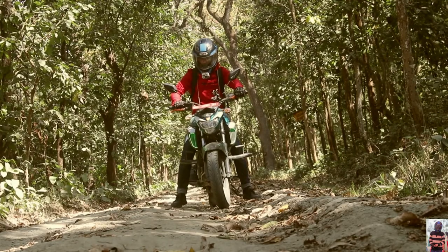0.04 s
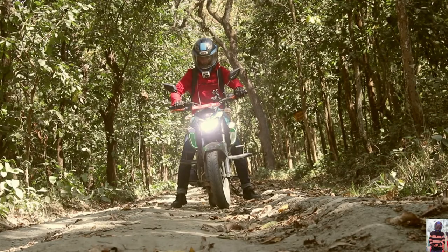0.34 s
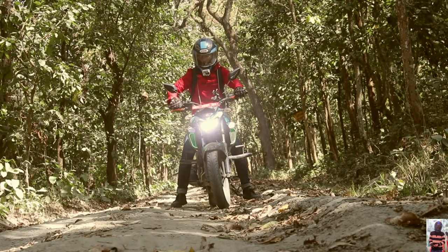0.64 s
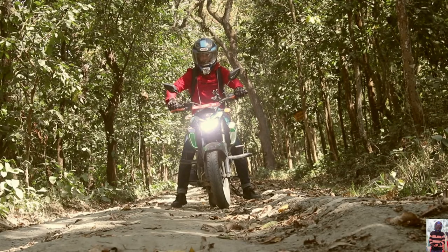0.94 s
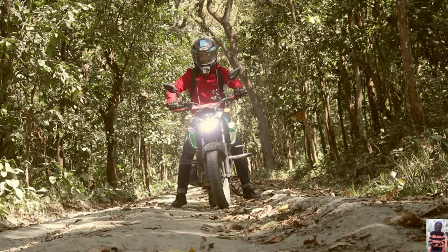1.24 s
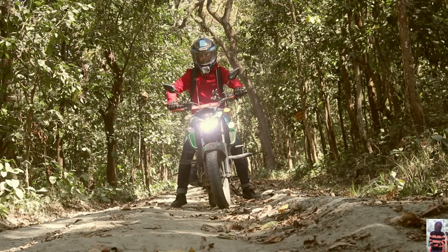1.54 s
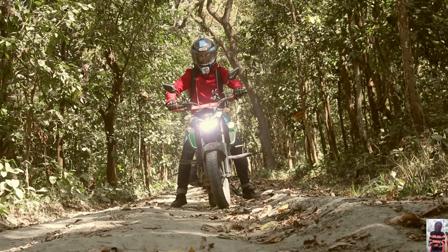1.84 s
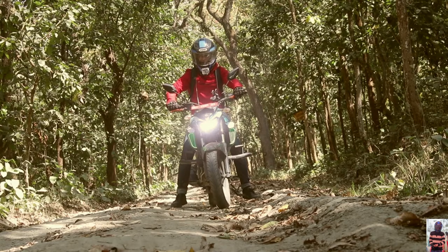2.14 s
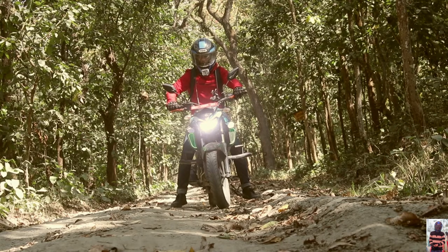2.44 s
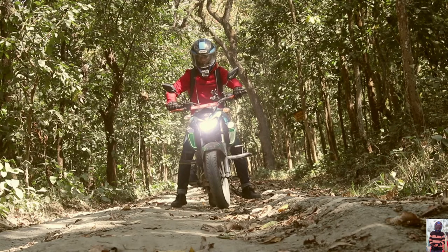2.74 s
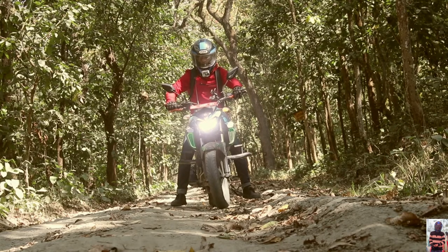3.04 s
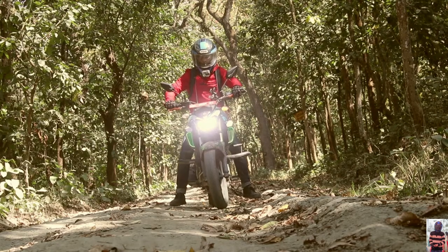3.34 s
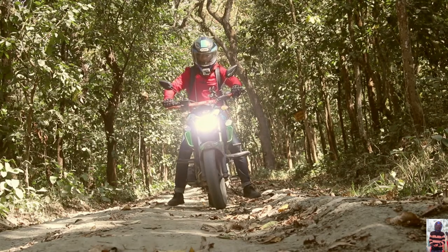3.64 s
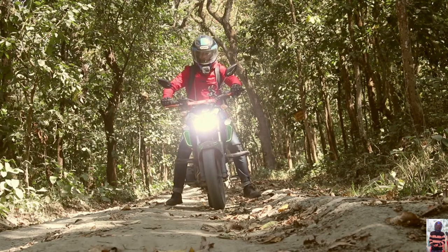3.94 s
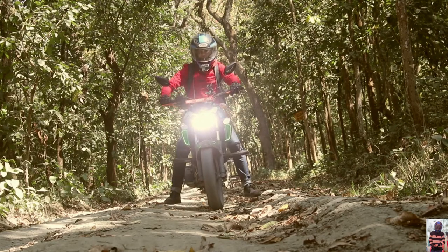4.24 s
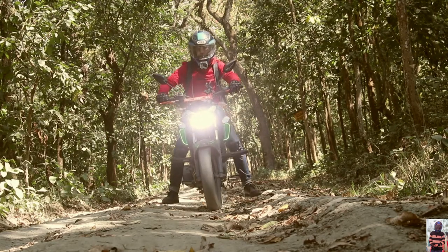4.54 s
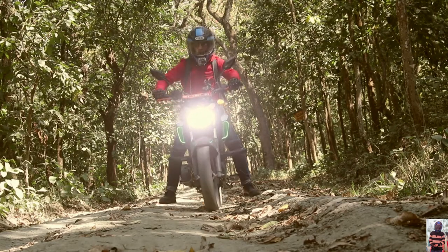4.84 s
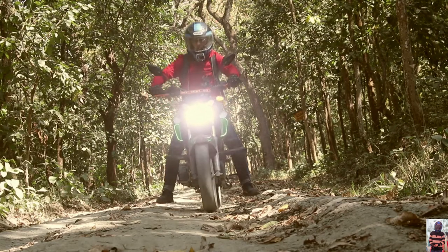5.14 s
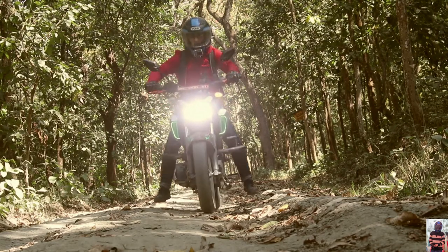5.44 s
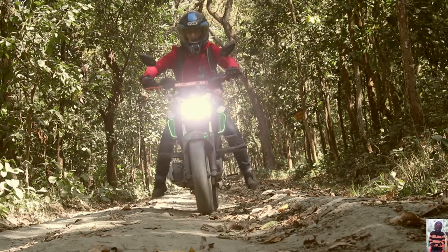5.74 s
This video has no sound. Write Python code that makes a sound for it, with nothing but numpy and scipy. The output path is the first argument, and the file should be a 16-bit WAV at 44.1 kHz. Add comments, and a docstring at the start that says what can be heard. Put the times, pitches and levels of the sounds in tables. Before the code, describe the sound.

A single-cylinder motorcycle is heard from some metres away on a forest track. From the start it is turned over with slow, deep chugs, a hollow drone and irregular metallic clacks. A brighter gear clash comes at about 0.6 seconds and a faint, thin squeak near 1.3. Between 1.6 and 2.1 seconds the engine catches with five heavy, barking thumps. It then runs up, reaching a fast idle at around 3 seconds: a rapid, throbbing exhaust beat with hollow intake honks, a gassy rasp, churning gears and ticking valves. From about 3.5 seconds it stays loud but gradually slows, labouring as the clutch takes up the load. The beat weakens around 5.8 seconds, and one last heavy thump lands just before 6. The trees add only a short, thin scatter to the pulses.

```python
"""Slow thumps and clatter: a single-cylinder four-stroke motorcycle is turned over on a forest track,
some metres away. It catches with a few barks, runs up to a fast idle, then labours and rasps as the
clutch takes up the load. Each firing pushes gas through a ringing pipe and a booming silencer, each
intake gulp honks in the air box, and gears and valves rattle the metal. Tree trunks scatter the pulses."""
import sys
import numpy as np
from scipy import signal
from scipy.fft import rfft, irfft, next_fast_len
from scipy.io import wavfile
from scipy.ndimage import map_coordinates

SR = 44100
rng = np.random.default_rng(int(sys.argv[2]) if len(sys.argv) > 2 else 0)


def unload_wav(signal):
    """Save mono or channel-first audio to the path in sys.argv[1] as 16-bit WAV at rate SR, clipped to [-1, 1]."""
    wavfile.write(
        sys.argv[1],
        SR,
        np.round(np.clip(np.atleast_2d(signal).T, -1, 1) * 32767).astype(np.int16),
    )


N = 264600

# engine speed once it runs: (time [s], firing rate [Hz])
FIRING_RATE = [(2.18, 10.03), (2.4, 10.81), (2.65, 12.27), (2.9, 13.95), (3.15, 14.68), (3.45, 14.19),
               (3.9, 14.01), (4.35, 13.75), (4.8, 13.33), (5.2, 12.71), (5.6, 12.03), (6.0, 11.88)]
# bright clink of small steel parts: (frequency [Hz], level [dB])
CLINK_SPECTRUM = [(600, -15), (1300, -7), (1900, -13.5), (2550, -4.5), (2850, -4.5), (3150, -0.5),
                  (3450, -5), (3750, -7.5), (4100, -10), (5000, -20), (5700, -17.5), (7200, -47)]
# hollow knock of the cases and air box: (frequency [Hz], level [dB])
KNOCK_SPECTRUM = [(150, -20.5), (300, -3.5), (450, 0.5), (620, -3), (800, -13), (1400, -19.5),
                  (2000, -35.5), (4000, -77)]
# bright edge of a gulp or a gear clash: (frequency [Hz], level [dB])
EDGE_SPECTRUM = [(500, -24), (800, -7.5), (1050, -4), (1350, 3), (1700, -8.5), (2200, -14), (3300, -10),
                 (5000, -21), (7000, -47)]
FAST_IDLE_HZ = 15.13
CHURN_DRIVE = dict(base_db=-21.5, per_effort=1.042, per_speed=0.06)


def amp(db):
    """Decibels to gain."""
    return 10 ** (np.asarray(db) / 20)


def seconds(samples=N):
    """A time axis."""
    return np.arange(samples) / SR


def along(points, hz):
    """(frequency, value) points read on a log axis."""
    f, v = np.transpose(points)
    return np.interp(np.log(hz + 1), np.log(f + 1), v)


def at(points, times):
    """(time, value) points read at the given times."""
    return np.interp(times, *np.transpose(points))


def wobble(rate):
    """A smooth random curve, rate knots a second."""
    knots = rng.standard_normal(int(N * rate / SR) + 4)
    return map_coordinates(knots, [seconds() * rate])


def filtered(x, response):
    """x times a complex response of frequency."""
    m = next_fast_len(N + SR // 2)
    return irfft(rfft(x, m) * response(np.fft.rfftfreq(m, 1 / SR)), m)[..., :N]


def resonate(x, modes):
    """x heard through a cavity's (frequency, width, level) resonances."""
    return filtered(x, lambda hz: sum(
        amp(db) * 1j * hz * width / (centre ** 2 - hz ** 2 + 1j * hz * width)
        for centre, width, db in modes))


def unit(x):
    """Scale to rms 1."""
    return x / np.sqrt(np.mean(x ** 2) + 1e-20)


def metal_noise(spectrum):
    """Stereo noise of rms 1 that rings in the metal, near mono in the bass and wider above."""
    # ringing of frame, cases and cooling fins: (frequency [Hz], width [Hz], lift [dB])
    metal_modes = [(186, 67, 7.5), (210, 8.3, 2.5), (254.1, 4.4, 7), (274.6, 10, 4), (323, 33, 2),
                   (406.5, 7.8, 8), (440.6, 18, 5), (497, 16, 2.5), (533.3, 12, 6.5), (619, 39.5, 8),
                   (739, 38, 4), (1050, 25, 5), (1220, 35, 3.5), (1370, 60, 3), (1650, 8.9, 6.5),
                   (1880, 9.1, 3), (2392, 44, 4.5), (2622, 44, 3.5), (2833, 55, 3.5), (3160, 40, 3),
                   (3310, 40, 2.5), (3430, 16, 7.5), (3510, 23, 6), (3965, 22, 1), (4060, 26, 7),
                   (4695, 50, 5.5), (5440, 280, 1)]
    # stereo image: (frequency [Hz], left-right likeness [0-1])
    likeness = [(60, 0.99), (110, 0.95), (200, 0.97), (350, 0.94), (640, 0.9), (1160, 0.39), (2100, 0.58),
                (3800, 0.77), (6870, 0.54)]
    grid = np.geomspace(10, SR / 2, 4000)
    lift_db = sum(db * np.exp(-((grid - centre) / width) ** 2) for centre, width, db in metal_modes)
    spread = np.arccos(along(likeness, grid)) / 2
    gains = amp(along(spectrum, grid) + lift_db) * np.array([np.cos(spread), np.sin(spread)])
    white = rng.standard_normal((2, N))
    mid, side = filtered(white, lambda hz: np.array([np.interp(hz, grid, g) for g in gains]))
    return unit(np.array([mid + side, mid - side]))


def swell(rise, samples=SR // 5):
    """An envelope that peaks at 1 after rise seconds and dies away."""
    u = seconds(samples) / rise
    return u * np.exp(1 - u)


def ring(hz, rise):
    """A cavity fills with one tone and empties again."""
    return swell(rise) * np.sin(2 * np.pi * hz * seconds(SR // 5))


def add(track, s, sound):
    """Mix a short sound into the track at s seconds."""
    start = round(s * SR)
    lo, hi = max(start, 0), min(start + len(sound), N)
    if hi > lo:
        track[lo:hi] += sound[lo - start:hi - start]


def puffs(times, sizes, width):
    """Smooth pushes of gas, width seconds from middle to flank."""
    track, t = np.zeros(N), seconds(SR // 10) - 0.05
    for s, size in zip(times, sizes):
        add(track, s + t[0], size * np.exp(-(t / width) ** 2 / 2))
    return track


def engine_cycles(runs_from_s=2.181):
    """Four-stroke cycles counted from the first steady firing, negative before it."""
    cycles = np.cumsum(at(FIRING_RATE, seconds())) / SR
    return cycles - cycles[round(runs_from_s * SR)]


def beats(cycles, place):
    """Times at which the running engine passes a place in its cycle."""
    return np.interp(np.arange(place, cycles[-1]), cycles, seconds())


def drive_db(times, base_db, per_effort, per_speed):
    """Level of an engine part: it rises so many dB for each dB of effort and of speed."""
    # how hard the engine works, about 0 at full effort: (time [s], effort [dB])
    effort = [(0, -11), (.2, -13.5), (.48, -15), (.56, -13), (.8, -12.5), (1.22, -14.5), (1.58, -14),
              (1.86, -5), (2.0, -9), (2.38, -7.5), (3.03, 0.5), (4.45, 0), (4.65, 0.5), (4.88, -0.5),
              (5.15, 0), (5.55, 1), (6.0, -4.5)]
    speed_db = 20 * np.log10(at(FIRING_RATE, times) / FAST_IDLE_HZ)
    return base_db + per_effort * at(effort, times) + per_speed * speed_db


def machinery(cycles):
    """Over a faint rumble, gears churn, gas rasps and the valve train clatters, pulsing once it runs."""
    # gear churn, deep rumble, gas rasp and valve-train clatter, each: (frequency [Hz], level [dB])
    churn_spectrum = [(25, -30), (70, -13.5), (100, -9), (140, -9.5), (165, -8.5), (200, -12.5), (235, -16),
                      (300, -7.5), (380, -11), (470, -7.5), (600, -12), (720, -17), (1000, -53)]
    rumble_spectrum = [(12, -5), (24, 1), (41, 9), (60, -18), (95, -13), (160, -47)]
    rasp_spectrum = [(400, -47.5), (740, 2), (900, 0.5), (1130, -4.5), (1300, -4.5), (1600, -8.5),
                     (2000, -14), (2800, -48.5)]
    clatter_spectrum = [(1120, -27), (1900, -13), (2200, -4), (2500, -3.5), (3300, -1), (3800, -5),
                        (4400, -8), (5100, -12), (5700, -14.5), (6500, -23.5), (7200, -57), (7800, -59)]
    # loudness around one cycle: (place [0-1], churn [dB], rasp [dB], clatter [dB])
    cycle_accents = [(0, -1.5, -0.5, 4.5), (0.11, 5.5, 2.5, 5), (0.24, -1, 0.5, 3.5), (.36, -1.5, 1.5, 2),
                     (0.48, 4, 0, 4.5), (0.599, 0.5, -0.5, 1), (.68, 1.5, 3.5, 2), (0.771, 1.5, 1.5, 1.5),
                     (0.89, 1, 1.5, 5)]
    place, *accents = np.transpose(cycle_accents)
    accents = [np.interp(cycles, place, db, period=1) for db in accents]
    firing = np.clip(cycles + 1, 0, 1)  # the accents set in with the steady firings
    churn_db, rasp_db, clatter_db = (db.mean() + firing * (db - db.mean()) for db in accents)
    t, settled = seconds(), np.clip(cycles / 10, 0, 1)
    churn_db += drive_db(t, **CHURN_DRIVE) - 2 - 4.5 * settled  # steady running is smoother
    rasp_db += drive_db(t, base_db=-35, per_effort=0.95, per_speed=0.2)
    clatter_db += drive_db(t, base_db=-43.22, per_effort=0.43, per_speed=0.92)
    churn = metal_noise(churn_spectrum)
    rumble = amp(-44) * metal_noise(rumble_spectrum)
    rasp = unit(amp(wobble(330)) * metal_noise(rasp_spectrum))  # a fast flutter adds grain
    bright = 0.5 + 0.5 * settled  # slow parts clink, fast parts hiss as well
    hiss = np.sqrt(bright) * metal_noise(clatter_spectrum)
    clink = np.sqrt(1 - bright) * metal_noise(CLINK_SPECTRUM)
    clatter = unit(amp(0.5 * wobble(200)) * (hiss + clink))
    return rumble + amp(churn_db) * churn + amp(rasp_db) * rasp + amp(clatter_db) * clatter


def drone(cycles, trim_db=-5, db_per_firing=-1.2):
    """A hollow drone while the engine is turned over; it sinks with every steady firing."""
    # the drone's low humps: (frequency [Hz], level [dB])
    drone_spectrum = [(60, -15), (98, -5), (140, -19), (178, -0.5), (205, -1.5), (232, -5), (270, -0.5),
                      (310, -19), (400, -44.5)]
    fade_db = db_per_firing * np.maximum(cycles, 0)
    return amp(drive_db(seconds(), **CHURN_DRIVE) + trim_db + fade_db) * metal_noise(drone_spectrum)


def start_up_clacks(clink_rise=0.0067, knock_trim_db=-4, tick_gap_s=0.13, tick_count=20):
    """Clacks and knocks of the starter, then the first loud valve ticks; lighter ticks fall between."""
    # starter clacks and, in the last two rows, valve ticks: (time [s], clink [dB], knock [dB])
    clacks = [(0.022, -48, -28.5), (0.062, -47, -39), (0.306, -48, -29), (0.468, -54, -47),
              (0.529, -39, -26.5), (0.58, -41.5, -28.5), (0.597, -46, -35), (0.656, -44, -32),
              (0.721, -40.5, -32), (0.769, -47, -34), (0.799, -42.5, -26), (0.879, -39, -30.5),
              (0.921, -44, -30.5), (1.013, -48, -43), (1.072, -40.5, -43), (1.165, -45, -48),
              (1.243, -48.5, -40), (1.277, -46.5, -32), (1.44, -46, -38), (1.638, -49, -31),
              (1.926, -42, -41), (2.024, -41, -34), (2.283, -42, -28.5), (2.428, -41, -27)]
    clinks, knocks = np.zeros((2, N))
    for s, clink_db, knock_db in clacks:
        add(clinks, s, amp(clink_db) * swell(clink_rise))
        add(knocks, s, amp(knock_db + knock_trim_db) * swell(rise=0.0048))
    for s in tick_gap_s * (np.arange(tick_count) + rng.random(tick_count)):
        add(clinks, s, amp(rng.normal(-49.5, 2)) * swell(clink_rise))
    return clinks * metal_noise(CLINK_SPECTRUM) + knocks * metal_noise(KNOCK_SPECTRUM)


def compression_chugs(boom_hz=41.5, hum_lead_s=0.112):
    """Each slow stroke hums in the air box, then booms and rumbles on in the silencer."""
    # compression strokes: (time [s], boom [dB], boom rise [s], intake hum [dB])
    strokes = [(0.147, -20.5, 0.012, -32.5), (0.359, -25.5, 0.016, -33.5), (0.614, -18.5, 0.018, -39),
               (0.858, -22, .022, -33), (1.379, -23, 0.021, -34), (1.503, -31, 0.025, -41),
               (1.694, -23, 0.011, -46)]
    track = np.zeros(N)
    overtone = amp(-13) * ring(hz=98, rise=0.011)
    tail = amp(-10) * ring(hz=30, rise=0.035)
    for s, boom_db, rise, hum_db in strokes:
        add(track, s - hum_lead_s, amp(hum_db) * ring(hz=270, rise=0.029))
        add(track, s, amp(boom_db) * (ring(boom_hz, rise) + overtone + tail))
    return track


def gear_clash(at_s=0.58, db=-39):
    """The starting gear bites with one brighter clash."""
    envelope = np.zeros(N)
    add(envelope, at_s, amp(db) * swell(rise=0.004))
    return envelope * metal_noise(EDGE_SPECTRUM)


def squeak(at_s=1.285, width_s=0.063, hz=2300, db=-53):
    """A faint, thin squeak just before the engine catches."""
    t = seconds()
    envelope = amp(db) * np.exp(-((t - at_s) / width_s) ** 2 / 2)
    return envelope * np.sin(2 * np.pi * hz * t + wobble(90))


def heavy_firings(crack_lead_s=0.019, boom_lead_s=0.0049, bark_lead_s=0.0019):
    """Single heavy firings: a crack in the cylinder, a thump, a bark and the boom of pipe and silencer."""
    # five as the engine catches, one at the very end:
    # (time [s], thump [dB], thump width [s], boom [dB], bark [dB], crack [dB])
    firings = [(1.622, -16, 0.0016, -21.5, -24, -47.5), (1.769, -15.5, 0.0016, -21, -21.5, -39),
               (1.882, -13.5, 0.002, -25.5, -23, -40.5), (1.995, -17, 0.0031, -18.5, -42, -46.5),
               (2.092, -17.5, 0.0023, -21, -32, -46), (5.937, -13.5, 0.0035, -24, -32.5, -57)]
    # exhaust bark and cylinder crack, each: (frequency [Hz], level [dB])
    bark_spectrum = [(90, -11), (160, 3.5), (340, -6), (450, -2.5), (620, 7), (700, -3), (800, 0),
                     (1000, -15), (1220, -5), (1800, -31.5), (3200, -47), (6000, -62)]
    crack_spectrum = [(600, -21), (1300, 5.5), (3300, 7), (5500, 2.0), (7400, -16.5)]
    body, bark, crack = np.zeros((3, N))
    for s, thump_db, width, boom_db, bark_db, crack_db in firings:
        body += puffs([s], [amp(thump_db)], width)
        add(body, s - boom_lead_s, amp(boom_db) * ring(hz=41, rise=0.02))  # silencer
        add(body, s - width, amp(thump_db - 6) * ring(hz=112, rise=0.0065))  # pipe
        add(bark, s - bark_lead_s, amp(bark_db) * swell(rise=0.0065))
        add(crack, s - crack_lead_s, amp(crack_db) * swell(rise=0.013))
    return body + bark * metal_noise(bark_spectrum) + crack * metal_noise(crack_spectrum)


def exhaust(cycles, thump_db=8, boom_db=-13, gulp_db=2, uneven_db=0.3):
    """Each firing pushes gas out through the silencer; half a cycle later the intake answers softly."""
    # silencer and pipe resonances: (frequency [Hz], width [Hz], level [dB])
    silencer_modes = [(29, 63, -1), (49.3, 32, 9), (108, 43, 6.5)]
    # firings start weak, ease off late and give way to one last heavy thump: (time [s], force [dB])
    firing_force = [(2.18, -5), (2.4, -0.5), (5.4, -0.5), (5.67, -0.5), (5.83, -4.5), (5.91, -18)]
    drive = dict(base_db=-22, per_effort=0.11, per_speed=0.05)
    firings, gulps = beats(cycles, 0), beats(cycles, 0.5)
    force_db = at(firing_force, firings) + uneven_db * rng.standard_normal(len(firings))
    push = puffs(firings, amp(drive_db(firings, **drive) + thump_db + force_db), width=0.0014)
    answer = puffs(gulps, amp(drive_db(gulps, **drive) + gulp_db), width=0.003)
    return push + amp(boom_db) * resonate(push, silencer_modes) + answer


def pipe(cycles, uneven_db=0.5):
    """A short ring as the exhaust valve opens, then the pipe rings after each firing and hums on."""
    # valve opening, then pipe rings: (offset from the firing [s], frequency [Hz], rise [s], level [dB])
    rings = [(-.0073, 288, 0.00087, 1), (.009, 271, 0.0033, -5.5), (.0051, 204, 0.0029, 2.5),
             (0.0168, 212, .0028, -1.5)]
    # the pipe rings fullest before the clutch takes up the load: (time [s], level [dB])
    fullness = [(2.4, 0), (3.1, -1.5), (3.7, 1.5), (4.3, 2), (5.15, 2), (5.45, -2), (6.0, -0.5)]
    # standing waves in the pipe: (frequency [Hz], width [Hz], level [dB])
    standing_waves = [(97.3, 16, 8.5), (177.6, 7.7, 8), (255.5, 9, 9), (274, 10, 3.5), (154.4, 7.9, 6.5),
                      (344.6, 7.5, 11.5)]
    track, firings = np.zeros(N), beats(cycles, 0)
    pulse_db = drive_db(firings, base_db=-20.5, per_effort=0.16, per_speed=2.4)
    pulse_db += at(fullness, firings) + uneven_db * rng.standard_normal(len(firings))
    for offset, hz, rise, db in rings:
        tone = -amp(db) * ring(hz, rise)
        for s, size in zip(firings, amp(pulse_db)):
            add(track, s + offset, size * tone)
    return track + resonate(track, standing_waves)


def throb(cycles, db=-37, per_speed=5.3):
    """Firing and gulp, one crank turn apart, merge into a deep throb that grows with speed."""
    speed = at(FIRING_RATE, seconds()) / FAST_IDLE_HZ
    fade_in = np.clip(cycles, 0, 1)
    return amp(db) * speed ** per_speed * fade_in * np.cos(4 * np.pi * cycles)


def tappets(cycles, uneven_db=2.5):
    """The valves tick and ring in the cylinder head, four ticks to a cycle."""
    # valve ticks: (place in the cycle [0-1], level [dB])
    valve_ticks = [(.04, -1.5), (.14, -1.5), (.52, -0.5), (.66, -1.5)]
    ticks, tick = np.zeros(N), swell(rise=0.0027, samples=SR // 20)
    for place, db in valve_ticks:
        for s in beats(cycles, place):
            add(ticks, s, amp(rng.normal(db, uneven_db)) * tick)
    gain = amp(drive_db(seconds(), base_db=-43, per_effort=0.022, per_speed=0.1))
    return gain * ticks * metal_noise(CLINK_SPECTRUM)


def intake(cycles, uneven_db=0.5):
    """The air box hums and honks with every gulp."""
    # air box resonances, struck once a cycle: (place [0-1], frequency [Hz], rise [s], level [dB])
    box_rings = [(.5, 271.3, 0.005, 2.5), (0.54, 620, 0.0064, -13.5), (0.14, 629, 0.0032, -4.5),
                 (.75, 620, 0.0032, -11.5), (.76, 404, 0.012, -4.5), (.55, 254, 0.006, -21.5),
                 (.1, 357.8, 0.0066, -0.5)]
    # tones the air box holds from gulp to gulp: (frequency [Hz], width [Hz], level [dB])
    held_tones = [(255.5, 5.7, -3), (406.3, 9, -5.5)]
    hum = np.zeros(N)
    for place, hz, rise, db in box_rings:
        tone, times = ring(hz, rise), beats(cycles, place)
        sizes = amp(drive_db(times, base_db=-22.5, per_effort=0.8, per_speed=1.5))
        for s, size in zip(times, sizes):
            add(hum, s, size * amp(rng.normal(db, uneven_db)) * tone)
    gulps = hum + honks(cycles)
    return gulps + resonate(gulps, held_tones)


def honks(cycles, hz=432, detune=0.015, uneven_db=2, puff_db=-17, rise=0.0043, lead_s=0.00496):
    """Every gulp honks in the air box with a rasping puff of air; ordinary honks wander a little in pitch, hard
    honks sound at their own set pitches."""
    # ordinary honks as the throttle is worked: (time [s], level [dB])
    honk_level = [(2.42, -33), (2.76, -19.5), (2.86, -23), (3.05, -19), (3.4, -16), (3.46, -29.5),
                  (3.68, -15), (3.75, -18), (3.89, -16.5), (4.1, -17.5), (4.55, -20.5), (4.77, -29.5),
                  (5.05, -23.5), (5.55, -22), (5.8, -29)]
    # the gulps that honk hardest: (time [s], level [dB], pitch [Hz])
    hard_honks = [(1.85, -20.5, 452), (2.149, -22.5, 494), (2.522, -15.5, 452), (2.607, -17, 446),
                  (2.688, -18, 448), (2.982, -14, 458), (3.188, -14, 465), (3.257, -16.5, 448),
                  (3.327, -14.5, 470), (3.538, -16.5, 436), (3.607, -16, 435), (3.822, -14, 433),
                  (3.959, -13.5, 418), (4.252, -16.5, 436), (4.323, -17.5, 432), (4.397, -13, 426),
                  (4.471, -14, 440), (4.617, -14.5, 432), (4.692, -16.5, 433), (4.917, -16.5, 432),
                  (5.153, -15, 404), (5.39, -14.5, 426), (5.634, -18, 430)]
    # the gulps rasp most while the engine runs up: (time [s], level against the honk [dB])
    rasp_level = [(2.7, -25.5), (2.95, -19), (3.4, -16), (3.6, -20), (4.2, -24)]
    times = beats(cycles, place=0.59)
    louder, higher = rng.standard_normal((len(times), 2)).T
    gulps = zip(times, at(honk_level, times) + uneven_db * louder, hz * (1 + detune * higher))
    hard_times = np.transpose(hard_honks)[0]  # a hard honk takes the place of its ordinary one
    ordinary = [gulp for gulp in gulps if np.abs(gulp[0] - hard_times).min() > 0.5 / FAST_IDLE_HZ]
    tones, air, edge = np.zeros((3, N))
    for s, db, pitch in [*ordinary, *hard_honks]:
        add(tones, s - lead_s, amp(db) * ring(pitch, rise))
        add(air, s - lead_s, amp(db + puff_db) * swell(rise))
        add(edge, s - lead_s, amp(db + at(rasp_level, s)) * swell(rise=0.0056))
    return tones + air * metal_noise(KNOCK_SPECTRUM)[0] + edge * metal_noise(EDGE_SPECTRUM)[0]


def forest(x):
    """Trunks scatter a short, thin tail to each side; the deep bass passes between them."""
    # decay among the trees: (frequency [Hz], time to fall 60 dB [s])
    decay_times = [(100, 0.033), (1000, 0.34), (6000, 0.22)]
    # tone of the scattered sound: (frequency [Hz], level [dB])
    colour = [(60, -11.5), (250, 9.0), (700, -1.5)]
    bands, t, grains = signal.stft(rng.standard_normal((2, SR // 2)), SR, nperseg=256)
    decay = amp(-60 * t / along(decay_times, bands)[:, None])
    tail = signal.istft(grains * decay, SR, nperseg=256)[1]
    wet = signal.fftconvolve(x[None], tail / np.linalg.norm(tail[0]), axes=1)[:, :N]
    return filtered(wet, lambda hz: amp(along(colour, hz)))


def scene():
    """The motorcycle among the trees, its bass a little to the left and its treble to the right."""
    # side chambers of silencer and air box swallow narrow bands:
    # (frequency [Hz], width [Hz], share swallowed [dB])
    traps = [(138, 12, -0.5), (230.4, 21, -5), (386.4, 20, -6.5)]
    # stereo balance: (frequency [Hz], left minus right [dB])
    balance = [(60, 2), (120, 0.5), (230, 0), (460, -2), (900, -3), (1770, -1.5), (3490, -2.5), (6870, -3)]
    cycles = engine_cycles()
    pulses = exhaust(cycles) + pipe(cycles) + intake(cycles)
    pulses -= resonate(pulses, traps)
    bike = pulses + amp(-17) * forest(pulses) + machinery(cycles) + tappets(cycles) + throb(cycles)
    bike += start_up_clacks() + compression_chugs() + gear_clash() + drone(cycles)
    bike += squeak() + heavy_firings()
    return filtered(bike, lambda hz: amp(np.outer([0.5, -0.5], along(balance, hz))))


def record(dry, low_hz=13, top_hz=7550, taper_hz=400):
    """The deepest bass rolls off and the top treble is cut away."""
    bass_cut = lambda hz: hz ** 4 / (hz ** 4 + low_hz ** 4)
    treble_cut = lambda hz: np.clip((top_hz - hz) / taper_hz, 0, 1)
    return filtered(dry, lambda hz: bass_cut(hz) * treble_cut(hz))


dry = scene()
out = record(dry)
unload_wav(out)
```